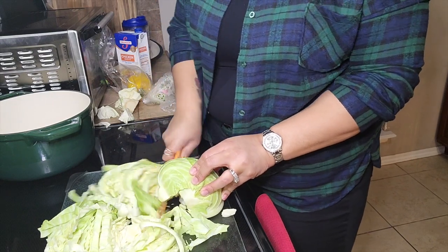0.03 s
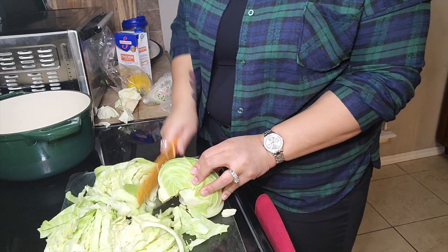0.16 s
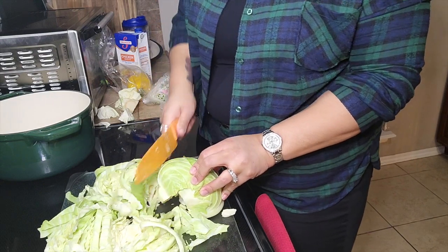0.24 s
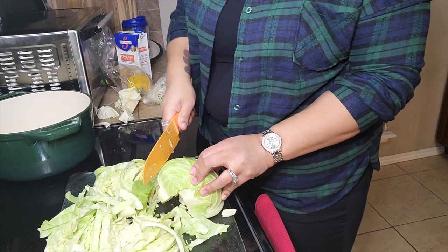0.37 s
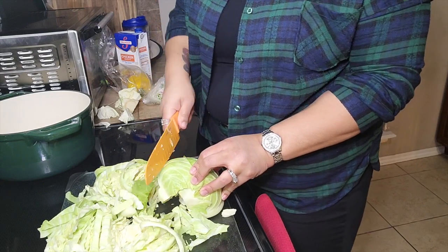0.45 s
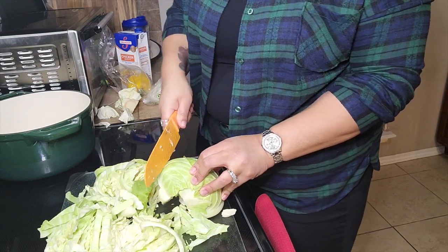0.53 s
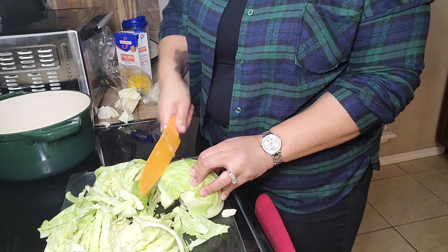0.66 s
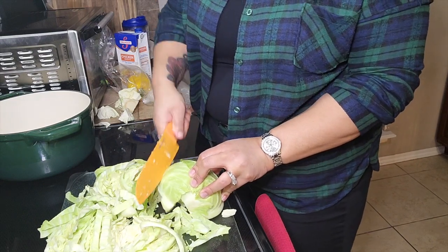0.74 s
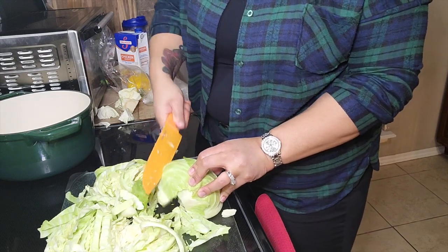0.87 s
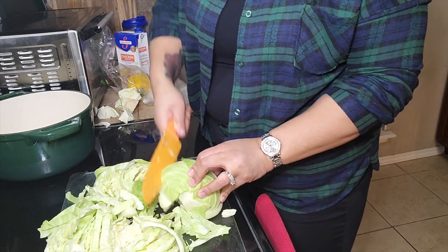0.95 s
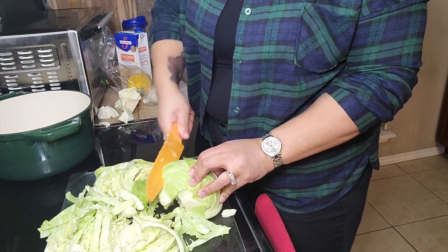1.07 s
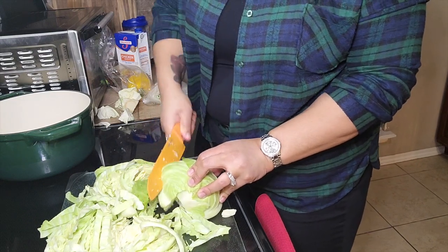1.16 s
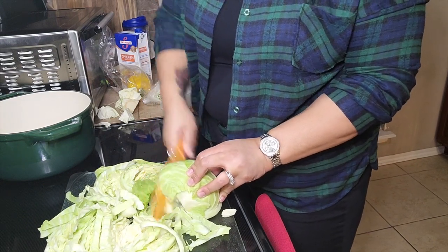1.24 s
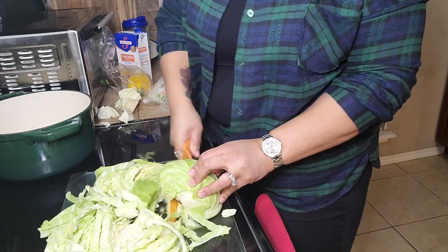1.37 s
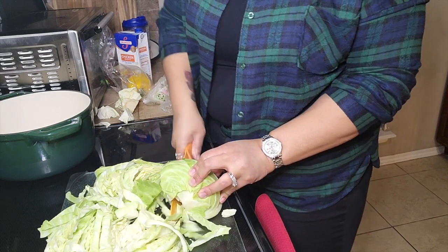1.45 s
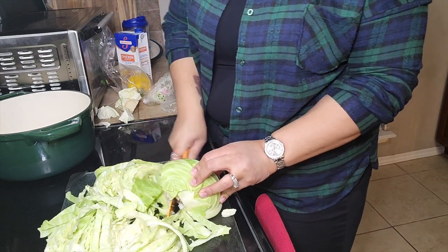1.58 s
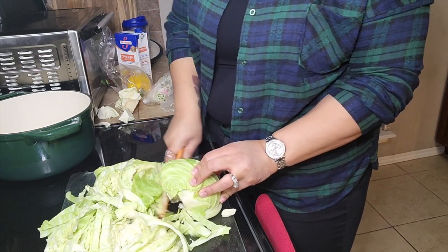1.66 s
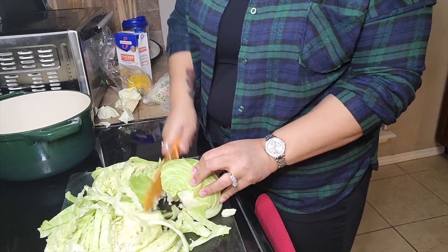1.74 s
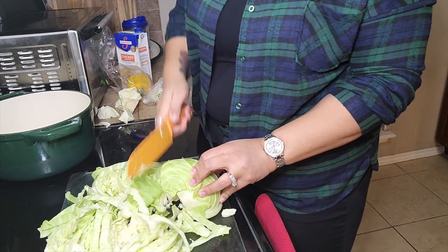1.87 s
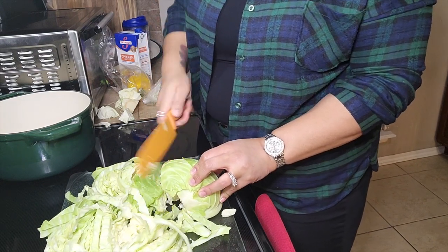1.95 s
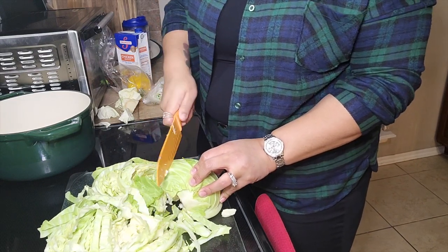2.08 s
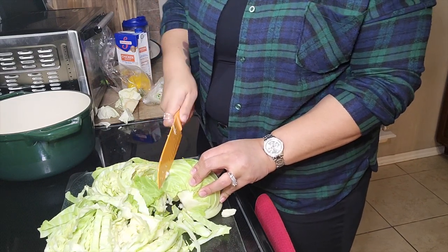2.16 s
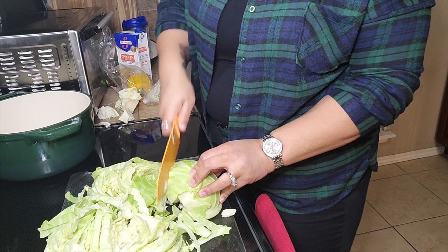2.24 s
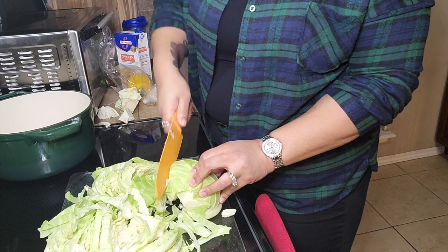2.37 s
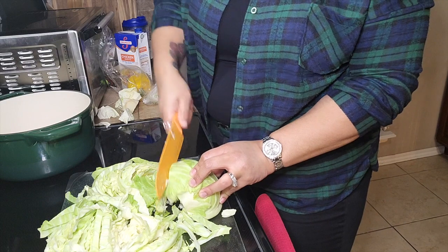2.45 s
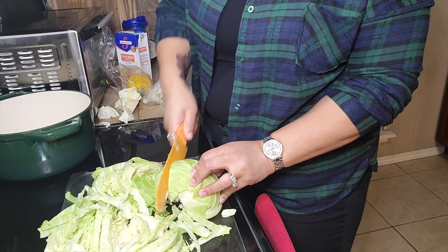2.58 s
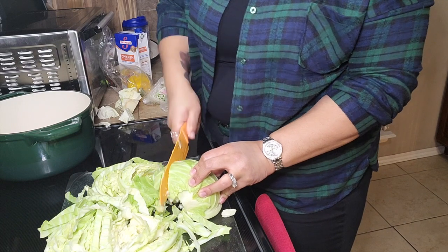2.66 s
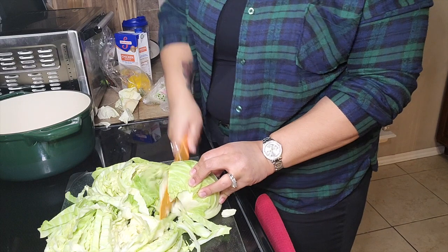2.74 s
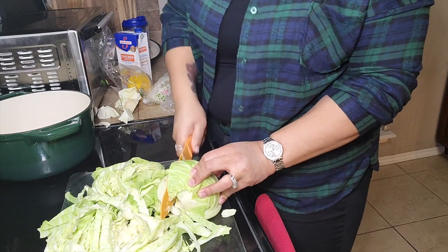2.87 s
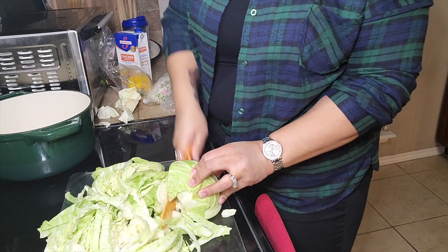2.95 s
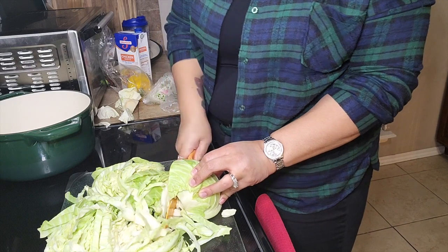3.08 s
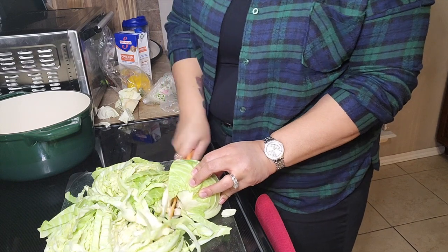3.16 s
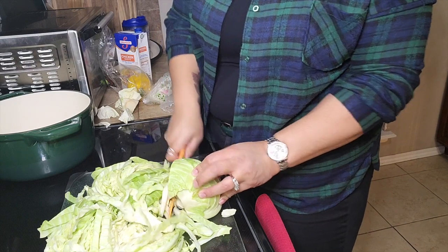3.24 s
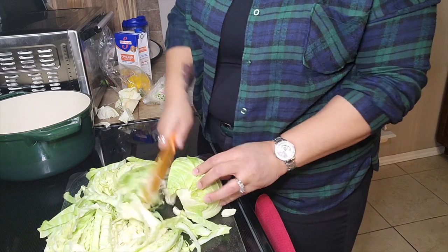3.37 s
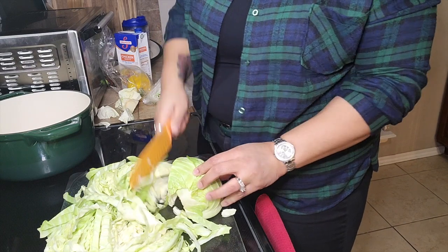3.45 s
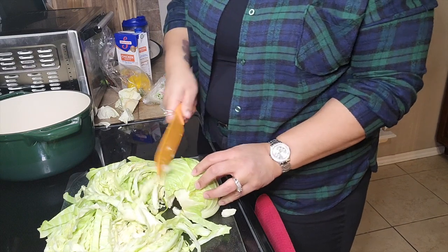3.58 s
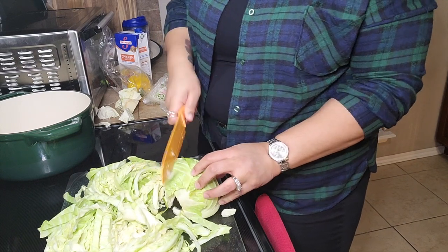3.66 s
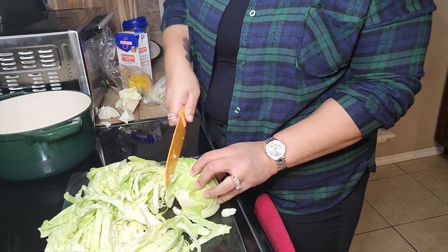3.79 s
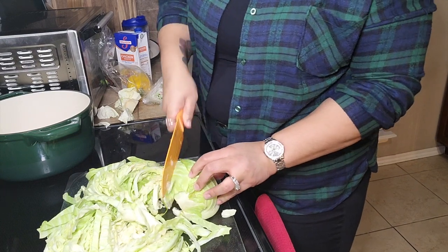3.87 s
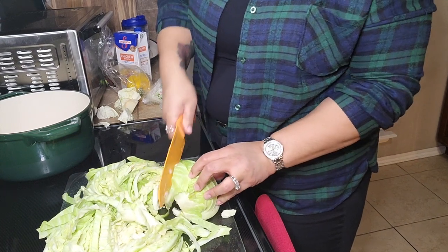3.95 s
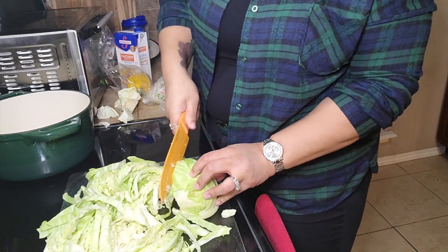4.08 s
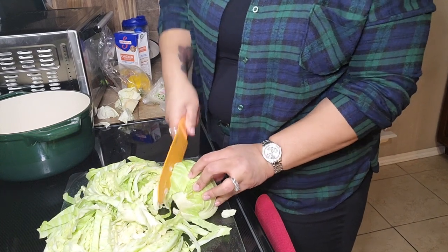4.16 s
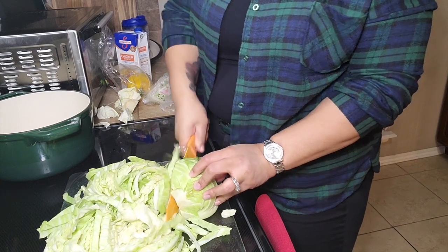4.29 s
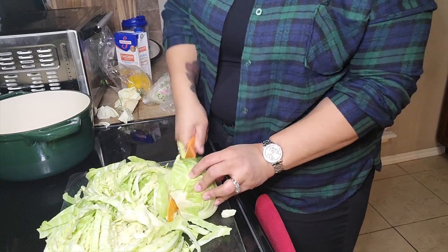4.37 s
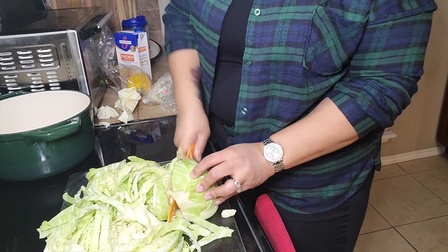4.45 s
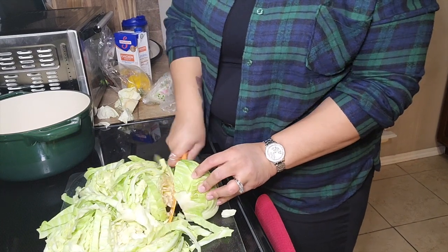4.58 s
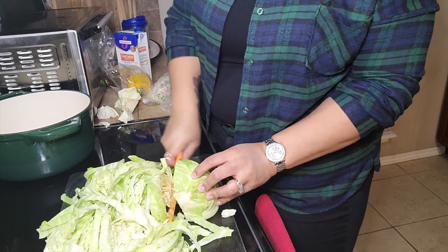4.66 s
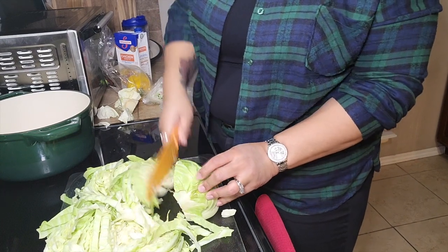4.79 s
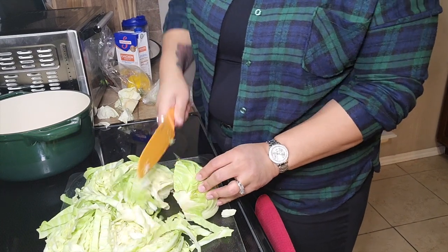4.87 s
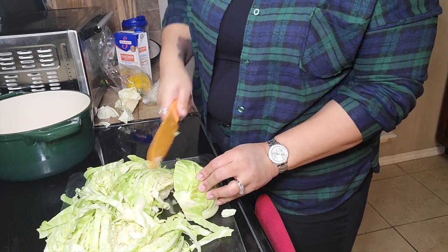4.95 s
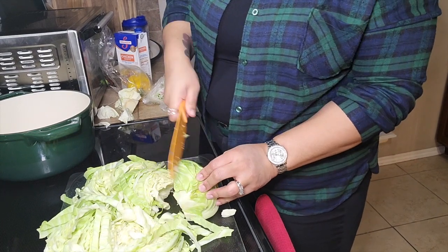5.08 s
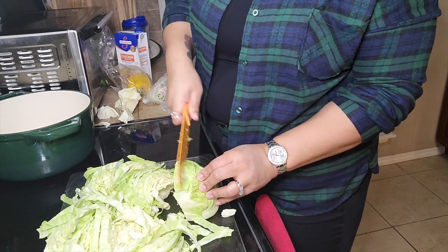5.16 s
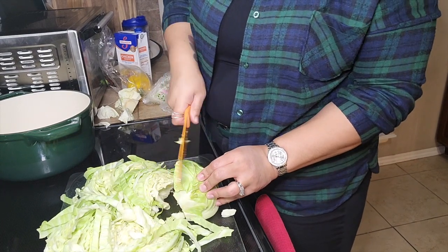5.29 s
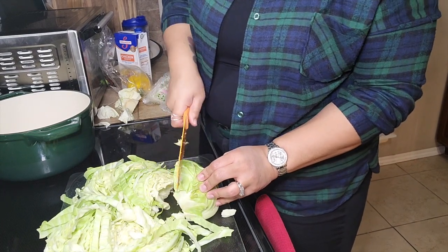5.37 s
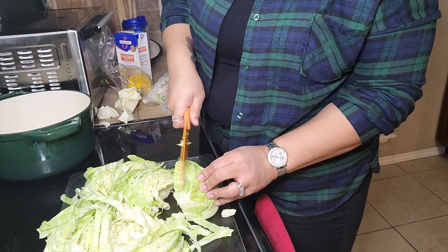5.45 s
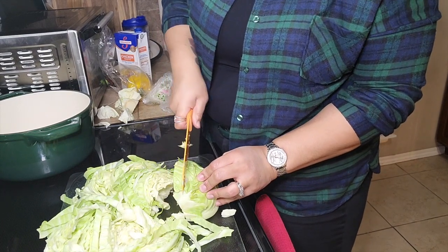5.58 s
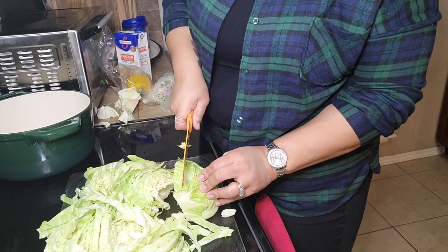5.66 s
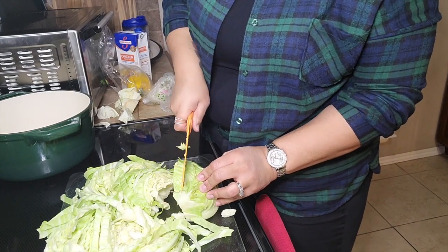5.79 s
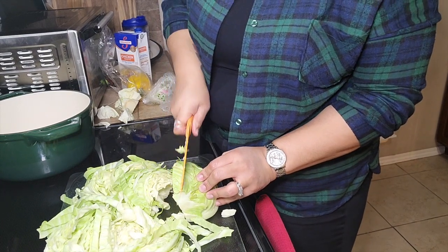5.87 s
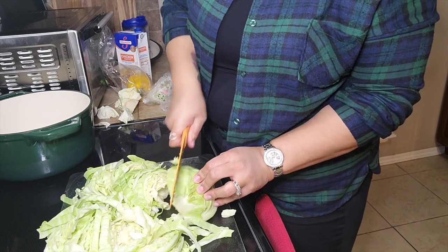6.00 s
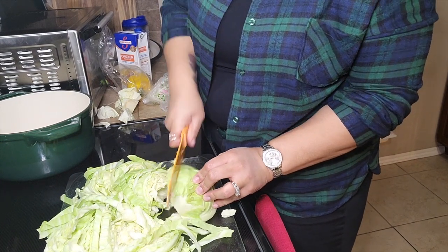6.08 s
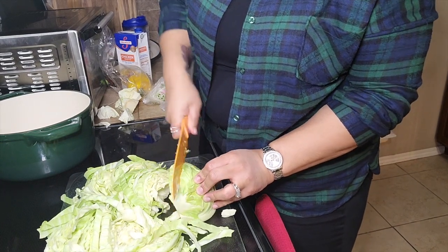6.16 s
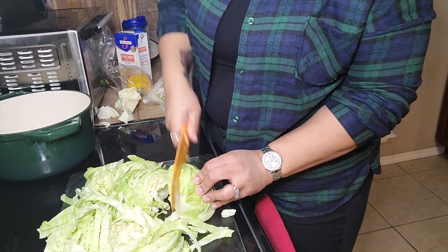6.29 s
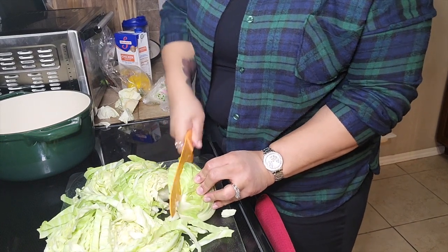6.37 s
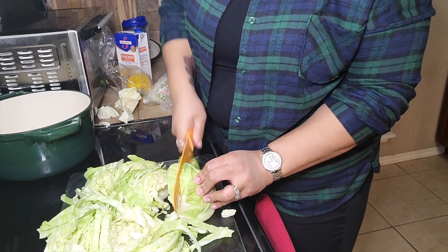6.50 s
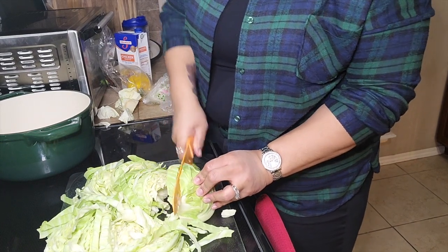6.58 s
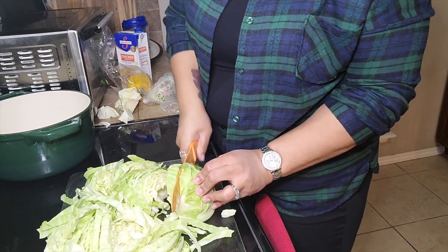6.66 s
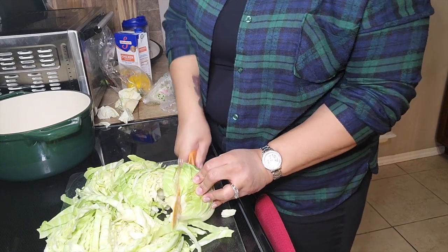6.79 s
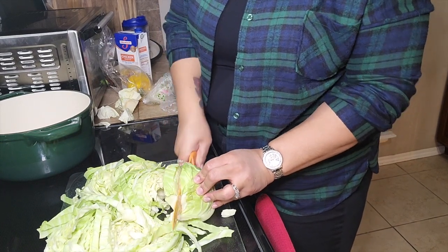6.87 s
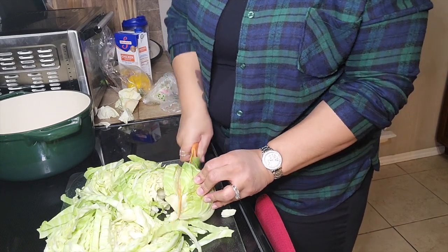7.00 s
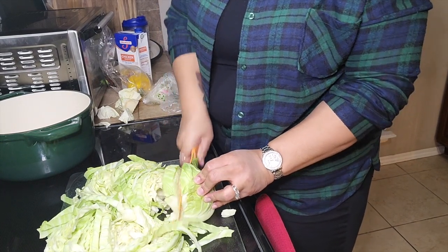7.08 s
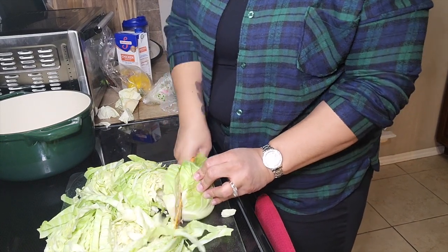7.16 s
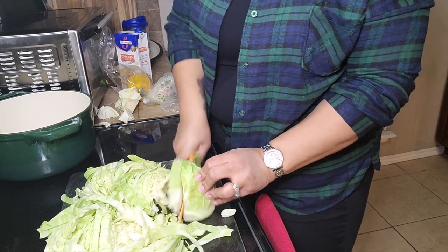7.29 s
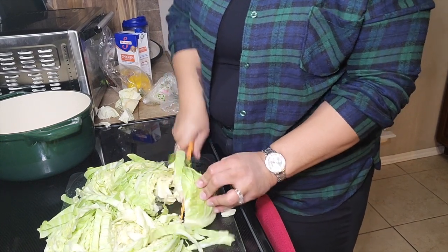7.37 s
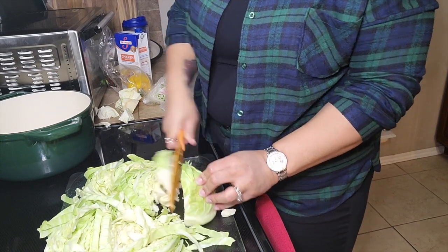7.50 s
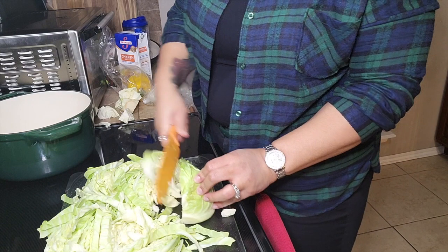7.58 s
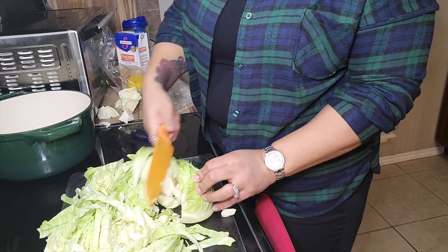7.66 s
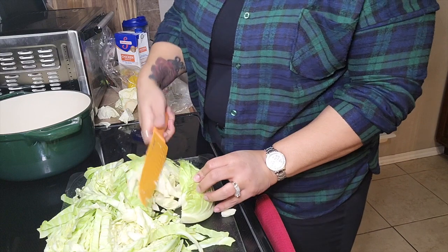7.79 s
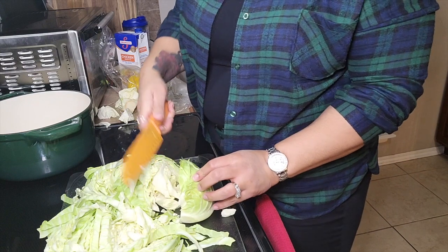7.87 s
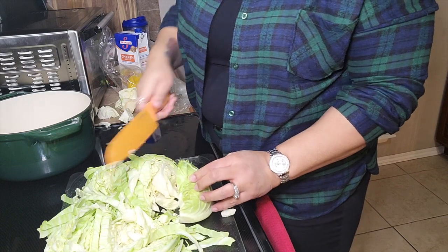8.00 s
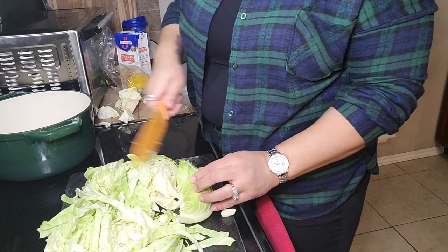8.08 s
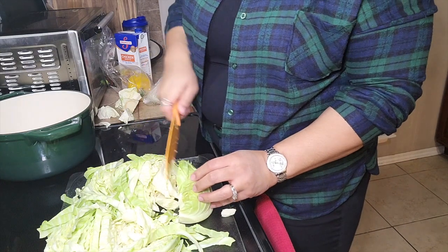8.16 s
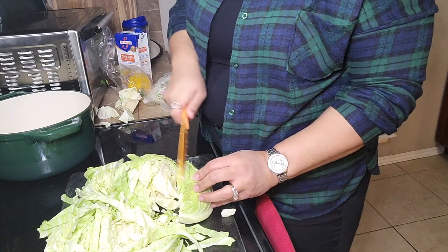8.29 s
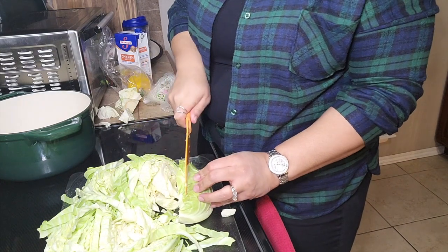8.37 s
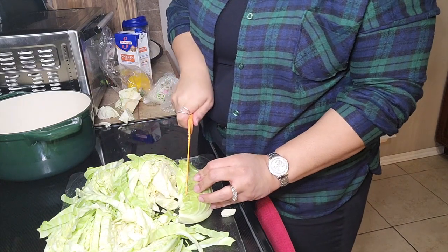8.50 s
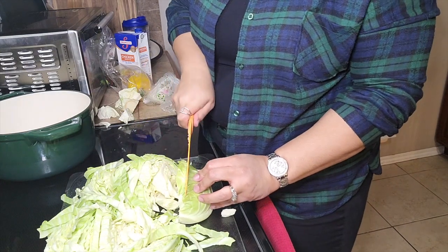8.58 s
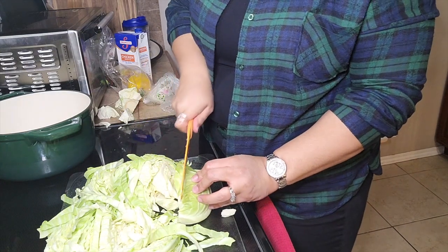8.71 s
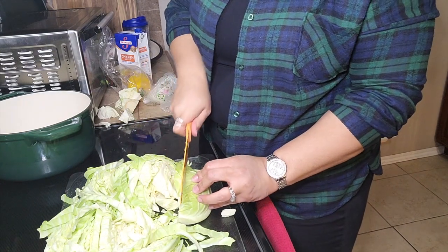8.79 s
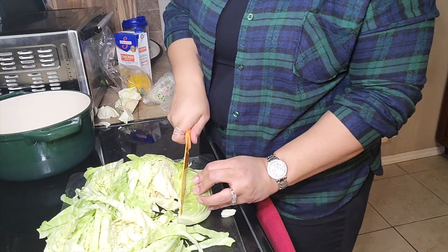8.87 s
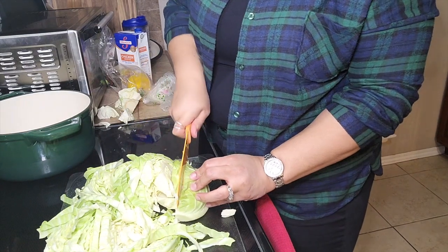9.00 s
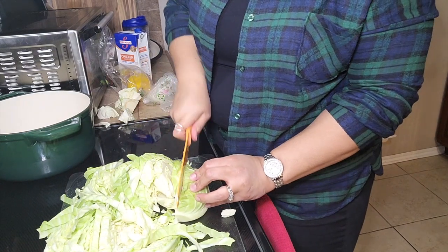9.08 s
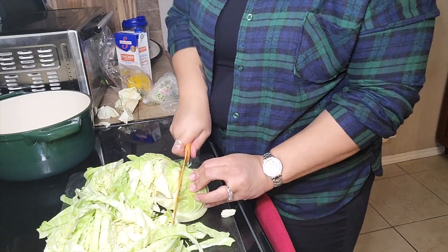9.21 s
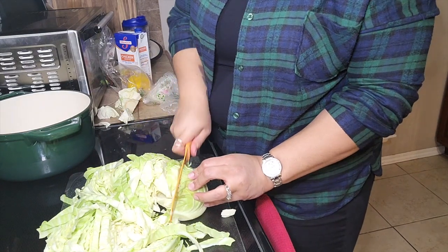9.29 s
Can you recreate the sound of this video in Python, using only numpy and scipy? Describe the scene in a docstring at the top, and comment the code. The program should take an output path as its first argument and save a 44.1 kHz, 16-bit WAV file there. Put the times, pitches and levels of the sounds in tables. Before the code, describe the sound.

Close-up wet, crunchy cabbage chopping on a board, brief scrapes and soft thumps between pauses, in a small humming kitchen.

```python
"""In a small, hard-walled kitchen a knife shreds a head of cabbage on a cutting board, close by.
Each push fractures layers of leaves: random impulses and short ringing grains, coloured by ribs and cells.
Stiff leaves snap as decaying runs of cracks with a hollow tone; low noise thuds as the board rocks.
Now and then the edge grates on the board, a stick-slip impulse train filtered by resonances.
A refrigerator hums behind as slowly wavering sine lines in soft noise; random echoes form the room."""
import sys
import numpy as np
from scipy import signal
from scipy.fft import rfft, irfft, next_fast_len
from scipy.io import wavfile
from scipy.ndimage import uniform_filter1d, map_coordinates

SR = 44100
rng = np.random.default_rng(int(sys.argv[2]) if len(sys.argv) > 2 else 0)


def unload_wav(signal):
    """Save mono or channel-first audio to the path in sys.argv[1] as 16-bit WAV at rate SR, clipped to [-1, 1]."""
    wavfile.write(
        sys.argv[1],
        SR,
        np.round(np.clip(np.atleast_2d(signal).T, -1, 1) * 32767).astype(np.int16),
    )


N = 411894
T = np.arange(N) / SR  # time [s]

# All table levels are relative: the mix and the filters scale them further.
# refrigerator motor and mains lines: (frequency [Hz], level [dB])
HUM_LINES = [(48.5, -53), (59.2, -43.5), (119, -60), (194, -57), (241, -66), (296.5, -62), (386, -64),
             (472, -68), (581, -67), (774.5, -71)]
# slow swell of the hum: (time [s], level [dB])
HUM_SWELL = [(0, -2), (2, -1.5), (3.5, -1), (4.8, 2.5), (5.7, 2), (8, 0), (9.34, 0)]
# spectrum of the rush of air: (frequency [Hz], level [dB])
AIR_COLOUR = [(12, -61), (20, -38.5), (39, -6.5), (63, 5.5), (88, -15.5), (130, -17), (146, -35),
              (187, -25.5), (301, -25), (590, -34), (718, -35.5), (780, -37), (1060, -44), (1370, -44),
              (16000, -83.5)]
# decay of the room's tail by 60 dB: (frequency [Hz], decay time [s])
ROOM_T60 = [(200, 0.54), (800, 0.48), (2000, 0.54), (3800, 0.43), (6000, 0.27), (14000, 0.65)]
# likeness of left and right in diffuse sound: (frequency [Hz], correlation [-1 to 1])
STEREO_LIKENESS = [(60, 0.97), (130, 1), (290, 0.4), (640, .6), (1400, 0.11), (3000, 0), (15000, 0)]
# stereo balance: (frequency [Hz], left minus right [dB])
STEREO_LEAN = [(120, -1.6), (250, -1), (500, -3.5), (1500, -0.2), (4000, 2.3), (8000, 0.4)]
TOP_HZ = 16050  # upper band limit

# the blade is pushed through a layer of leaves:
# (time of full force [s], hold [s], tearing ribs [dB], bursting cells [dB], board shaking [dB])
PUSHES = [(0.691, 0.017, -32, -33.5, -28.5), (0.816, .018, -35, -32.5, -37.5),
          (0.951, 0.045, -26.5, -29.5, -22.5), (1.074, 0.016, -34, -34, -38),
          (1.198, 0.084, -25.5, -28.5, -22.5), (2.253, 0.025, -29, -27.5, -20.5),
          (2.494, 0.049, -26.5, -30, -21), (2.634, 0.0099, -33, -34, -35.5),
          (2.726, 0.057, -27, -30.5, -21.5), (2.944, .037, -28, -33.5, -27),
          (3.9, 0.085, -30.5, -33.5, -21), (4.172, 0.088, -25.5, -29, -21), (4.476, 0.021, -28, -40, -30.5),
          (5.95, 0.062, -33.5, -33, -28), (6.129, .008, -34.5, -33, -31), (6.275, 0.074, -28.5, -30.5, -22),
          (6.536, .072, -30.5, -34.5, -26.5), (6.733, 0.085, -25.5, -30.5, -23.5),
          (7.103, 0.061, -24, -28.5, -24.5), (8.728, 0.034, -39, -34.5, -26.5),
          (8.811, .045, -33, -34, -25.5), (9.121, 0.095, -27.5, -34, -22.5)]
BITE_DB_PER_S, SAG_DB_PER_S, RELEASE_DB_PER_S = 700, 11, 452.5  # a push builds fast, sags, and lets go
RUB_DB, RUB_FADE_DB_PER_S = -15, 85  # after a push the blade rubs on in the cut
# light strokes, the blade sliding in the cut or brushing loose leaves:
# (time [s], hold [s], tearing ribs [dB], bursting cells [dB])
LIGHT_STROKES = [(0.608, .05, -46, -51.5), (1.11, .025, -39, -42.5), (1.371, 0.11, -33, -37.5),
                 (2.2, .03, -47, -46), (2.709, .015, -37, -38.5), (2.854, 0.062, -40.5, -47.5),
                 (2.923, .015, -39, -40), (3.255, 0.15, -57, -56.5), (3.473, 0.036, -53.5, -48.5),
                 (3.683, 0.078, -72.5, -61.5), (3.861, .02, -43.5, -41.5), (4.045, .04, -41.5, -39),
                 (4.158, .015, -34.5, -38.5), (4.337, 0.2, -38.5, -45), (4.576, 0.12, -53, -57.5),
                 (4.746, 0.043, -47.5, -45), (4.86, 0.114, -66, -66), (5.19, 0.013, -60.5, -53.5),
                 (5.39, .05, -68.5, -55), (5.464, 0.019, -50, -32.5), (5.829, .1, -63.5, -53.5),
                 (6.168, 0.049, -42.5, -40), (6.39, .1, -40.5, -43), (6.67, 0.019, -36, -42.5),
                 (6.912, 0.118, -39.5, -46.5), (7.038, .04, -36.5, -42), (7.494, .35, -65, -59),
                 (8.661, 0.055, -47.5, -43.5), (8.981, .08, -47, -51.5), (9.255, 0.079, -43, -53.5)]
STROKE_RISE_DB_PER_S, STROKE_FALL_DB_PER_S = 602, 452
STROKE_SHAKE_DB = 2  # board shaking under a light stroke, over the level of its ribs
# the cabbage is bumped against the board: (time [s], level [dB])
BUMPS = [(3.095, -28.5), (4.43, -29), (5.195, -31), (6.689, -24), (9.235, -28.5)]
BUMP_HOLD_S = .025
# the board rocks just after each push and settles slowly
SHAKE_LAG_S, SHAKE_RISE_DB_PER_S, SHAKE_FALL_DB_PER_S = .018, 551, 278
# spectrum of the rocking: (frequency [Hz], level [dB])
SHAKE_COLOUR = [(25, -19), (42, 6.5), (56, 8), (80, 6.5), (110, -6), (150, -2.5), (190, -12.5), (260, -15),
                (340, -29.5), (600, -69)]

# the edge grating on the board: (time [s], rise [s], hold [s], 60 dB fade [s], level [dB],
# brightness [dB per octave], low body [dB], favoured resonance [Hz])
SCRAPES = [(0, .001, .012, .15, -16, -0.5, -1.5, 600), (1.439, 0.0024, 0.004, .03, -19, 1.5, -2, 1433),
           (1.494, .002, 0.026, .04, -20, 1, -1, 876), (1.517, .006, 0.0098, .04, -15.5, -2.5, -11.5, 890),
           (1.561, .003, .036, .05, -14, 1, 0.5, 871), (1.601, 0.0026, 0.033, .08, -17.5, -0.5, -3, 2162),
           (3.058, .02, .03, .1, -22, 0, -3.5, 1370), (3.083, .001, 0.0022, 0.02, -8, 3.5, 0.5, 2950),
           (3.146, 0.0026, .02, .05, -20.5, 4, 3.5, 1486), (3.168, 0.0057, 0.0052, .08, -14, 1, 3, 2064),
           (7.256, .008, 0.011, .05, -19.5, 0, -2.5, 1880), (7.28, 0.0012, 0.0042, .03, -13, 0, -6.5, 1860),
           (7.285, .004, 0.026, .3, -17.5, 0, -1.5, 1930)]
# spectrum of the grating: (frequency [Hz], level [dB])
GRATE_COLOUR = [(88, -45.5), (150, -15), (303, -11.5), (406, -12), (494, -13), (854, -6.5), (1170, -10.5),
                (1450, -5.5), (2360, -10.5), (5250, -14), (6260, -25.5), (16000, -48.5)]
# ringing of board and blade: (frequency [Hz], width [Hz], usual level [dB])
BOARD_MODES = [(417, 25, 3), (580, 25, 2.5), (892, 100, -7.5), (960, 25, -10), (1330, 88, -0.5),
               (1810, 46, -3.5), (2160, 9.1, -6.5), (2444, 23, -2), (3200, 50, -5), (3470, 25, -7.5),
               (3680, 240, -6), (4020, 55, -6), (4900, 150, -17.5), (5140, 87, -11.5), (5750, 30, -22),
               (6510, 140, -26.5)]
# the board's broad, damped response, strongest from 700 Hz to 2 kHz: (frequency [Hz], level [dB])
BOARD_DAMPED = [(220, -6.5), (400, -14.5), (700, -4), (2000, -5), (4000, -13), (9000, -6.5)]

# single leaves snapping: (time [s], crack [dB], hollow pock over the crack [dB])
SNAPS = [(.3253, -51.5, -8), (.4788, -53.5, -11), (0.5953, -35, 0), (0.6223, -31, 3), (.9266, -30, -5),
         (.9405, -22.5, 8), (1.068, -26, -9), (1.1092, -23, -13.5), (1.19, -28, -3), (1.8246, -41.5, -6),
         (2.0382, -48, -12), (2.1284, -49, -9), (2.1647, -40.5, -6), (2.2157, -25.5, -19),
         (2.2523, -15.5, -18), (2.4687, -31, -4.5), (2.4902, -22.5, -2), (2.7643, -26, 8.5),
         (3.071, -24.5, -8.5), (3.0865, -17, -8.5), (3.4583, -43, -10), (3.9034, -17, -18),
         (3.9508, -15, -27), (3.9872, -27, 7), (4.1345, -23, -12), (4.2094, -24.5, 8.5), (4.3374, -27, -2),
         (4.4787, -28, -8), (4.706, -39.5, 2), (5.1803, -37, -14), (5.2908, -37, -11), (5.4572, -29.5, -27),
         (5.6462, -42.5, -11), (5.8653, -34.5, -7), (5.9539, -18, -20), (5.9756, -16.5, -28),
         (6.095, -26, -29), (6.127, -22, -7.5), (6.5815, -14.5, -12), (6.7238, -15, -7),
         (6.901, -36.5, 11.5), (6.9494, -41, 18), (7.0369, -25, 0), (7.2815, -18, -11), (7.977, -48, -9),
         (8.1205, -47.5, -2), (8.6408, -30.5, -4), (8.6837, -22.5, -7), (8.7076, -30.5, -11),
         (8.806, -25.5, 4), (9.105, -21, -11), (9.1241, -14.5, -10)]
# spectrum of a snap: (frequency [Hz], level [dB])
SNAP_COLOUR = [(600, -22.5), (1500, -5.5), (2800, -9.5), (3900, -5), (5200, 1.5), (6400, -9.5), (9000, -2),
               (15000, -8)]
POCK_HZ, POCK_SCATTER = 917, .2  # a rib's median note, and its relative spread from leaf to leaf
SNAP_TOP_DB, SNAP_DULLING = -10, 0.32  # usual treble change, and loss per dB of strength: thick is dull
# candidate chance snaps, their level over the bursting cells, and their pock over the crack
SMALL_SNAPS_PER_S, SMALL_SNAP_DB, SMALL_SNAP_POCK_DB = 9.3, 5, -6

# spectrum of the tearing ribs: (frequency [Hz], level [dB])
RIB_COLOUR = [(150, -26), (260, -4.5), (340, -13), (430, -1), (580, -8), (850, 5), (1050, -5), (1400, 1),
              (2000, -7), (2800, -17), (4200, -36.5), (6600, -57.5)]
# spectrum of the bursting cells: (frequency [Hz], level [dB])
CELL_COLOUR = [(1530, -46.5), (2600, -2.5), (3830, -3.5), (4670, -2), (5270, -1.5), (6330, -11),
               (8980, -7.5), (12900, -14.5), (16000, -24)]


def amp(db):
    """Logarithmic level: 20 dB is a factor of ten in amplitude."""
    return 10 ** (np.asarray(db) / 20)


def unit(x):
    """Power normalisation: scale to rms 1."""
    return x / np.sqrt(np.mean(np.abs(x) ** 2) + 1e-20)


def along(points, hz):
    """Interpolation of (frequency, value) points on a logarithmic frequency axis."""
    f, v = np.transpose(points)
    return np.interp(np.log(hz + 1), np.log(f + 1), v)


def colour(points):
    """Spectral envelope: (frequency, dB) points as a gain over frequency."""
    return lambda hz: amp(along(points, hz))


def wobble(rate):
    """Smooth random fluctuation: a spline through rate random knots per second."""
    knots = rng.standard_normal(int(N * rate / SR) + 4)
    return map_coordinates(knots, [T * rate])


def filtered(x, response):
    """Linear filtering: multiply the spectrum by a response of frequency."""
    n = x.shape[-1]
    m = next_fast_len(n + 8192)
    return irfft(rfft(x, m) * response(np.fft.rfftfreq(m, 1 / SR)), m)[..., :n]


def ring(gain, size=4096):
    """Minimum phase: the folded cepstrum of a gain gives a causal impulse response of energy 1."""
    cepstrum = irfft(np.log(np.maximum(gain(np.fft.rfftfreq(size, 1 / SR)), 1e-6)))
    cepstrum[1:size // 2] *= 2
    cepstrum[size // 2 + 1:] = 0
    h = irfft(np.exp(rfft(cepstrum)))
    return h / np.linalg.norm(h)


def add(track, s, sound):
    """Superposition: mix a sound into the track at time s."""
    i = max(round(s * SR), 0)
    track[i:i + len(sound)] += sound[:max(N - i, 0)]


def leveled(x, size):
    """Constant local power: divide by the running rms over size samples."""
    return x / np.sqrt(np.abs(uniform_filter1d(x ** 2, size=size)) + 1e-4)


def fractures(n, rate, spread_db):
    """Random fracture: impulses at chance moments, of very unequal size, rms 1."""
    happens = rng.random(n) < rate / SR
    sign = rng.choice([-1, 1], n)
    size = amp(spread_db * np.clip(rng.standard_normal(n), -2, 2))
    return unit(happens * sign * size)


def diffuse(n):
    """Diffuse field: stereo noise alike in the bass and unrelated in the treble."""
    def mid_side(hz):
        """The angle between mid and side sets the correlation of the channels."""
        turn = np.arccos(np.clip(along(STEREO_LIKENESS, hz), -1, 1)) / 2
        return np.array([np.cos(turn), np.sin(turn)])

    mid, side = filtered(rng.standard_normal((2, n)), mid_side)
    return np.array([mid + side, mid - side])


def refrigerator(air_db, hiss_db):
    """Line spectrum: wavering motor and mains tones over a rush of air and microphone hiss."""
    def line(hz):
        """Phase modulation: a sine whose phase wanders, more so at high frequency."""
        phase = hz / 450 * wobble(3) + 2 * np.pi * rng.random()
        return np.sqrt(2) * np.sin(2 * np.pi * hz * T + phase)

    hum = sum(amp(db + .7 * wobble(3)) * line(hz) for hz, db in HUM_LINES)
    hum_gain = amp(np.interp(T, *np.transpose(HUM_SWELL)))
    bass_cut = [(70, -14.0), (250, 2.5)]
    air = unit(filtered(diffuse(N), lambda hz: amp(along(AIR_COLOUR, hz) + along(bass_cut, hz))))
    hiss = rng.standard_normal((2, N))
    return hum_gain * hum + amp(air_db) * air + amp(hiss_db) * hiss


def moving(x, responses, size):
    """Echoes of a moving source: each short, overlapping stretch meets a new stereo response."""
    hop = size // 2
    padded, out = np.pad(x, (hop, size)), np.zeros((2, N + SR))
    window = np.sqrt(np.hanning(size))
    for i in range(0, N + hop, hop):
        response = responses()
        response = response / np.linalg.norm(response) * np.sqrt(2)
        stretch = padded[i:i + size] * window
        echo = signal.fftconvolve(stretch[None], response, axes=1)
        out[:, i:i + echo.shape[1]] += echo
    return out[:, hop:hop + N]


def kitchen(x, direct_db, near_db, near_t60, room_db, size):
    """Reverberation: direct sound, scatter from pot and counter (new every half size), and a tail."""
    noise = diffuse(3 * SR)
    hz, t, z = signal.stft(noise, SR, nperseg=256)
    decay = amp(-60 * t / along(ROOM_T60, hz)[:, None])
    fade = (decay * (1 - np.exp(-t / .008)))[:, :170]  # the tail builds up over some 8 ms
    lag = T[:SR // 30]
    quick = amp(-60 * lag / near_t60) * (lag > .0003)

    def near():
        """Early reflections: a short decaying excerpt of diffuse noise."""
        return noise[:, rng.integers(2 * SR):][:, :len(lag)] * quick

    def tail():
        """Late reverberation: diffuse noise with a decay time for each frequency."""
        start = rng.integers(z.shape[-1] - fade.shape[1])
        return signal.istft(z[..., start:start + fade.shape[1]] * fade, SR, nperseg=256)[1]

    early = amp(near_db) * moving(x, near, size=size)
    late = amp(room_db) * moving(x, tail, size=16384)
    return amp(direct_db) * x + early + late


def swell(start, hold, rise, fall):
    """Exponential growth and decay: 0 dB during the hold, straight dB-per-second slopes around it."""
    return -rise * np.maximum(start - T, 0) - fall * np.maximum(T - start - hold, 0)


def effort():
    """Dominant force: the strongest action of the blade sets the gain of ribs, cells and shaking."""
    ribs, cells, shake = np.full((3, N), -120.0)
    for s, hold, ribs_db, cells_db, shake_db in PUSHES:
        force = swell(s, hold, BITE_DB_PER_S, RELEASE_DB_PER_S) - SAG_DB_PER_S * np.clip(T - s, 0, hold)
        rub = RUB_DB + swell(s, hold, BITE_DB_PER_S, RUB_FADE_DB_PER_S)
        force = np.maximum(force, rub)
        rocking = swell(s + SHAKE_LAG_S, hold, SHAKE_RISE_DB_PER_S, SHAKE_FALL_DB_PER_S)
        ribs = np.maximum(ribs, ribs_db + force)
        cells = np.maximum(cells, cells_db + force)
        shake = np.maximum(shake, shake_db + rocking)
    for s, hold, ribs_db, cells_db in LIGHT_STROKES:
        force = swell(s, hold, STROKE_RISE_DB_PER_S, STROKE_FALL_DB_PER_S)
        ribs = np.maximum(ribs, ribs_db + force)
        cells = np.maximum(cells, cells_db + force)
        shake = np.maximum(shake, ribs_db + STROKE_SHAKE_DB + force)
    for s, db in BUMPS:
        rocking = swell(s, BUMP_HOLD_S, SHAKE_RISE_DB_PER_S, SHAKE_FALL_DB_PER_S)
        shake = np.maximum(shake, db + rocking)
    return amp([ribs, cells, shake])


def shaking(push, level_db):
    """Forced vibration: the jerking blade rocks board and counter in a low thudding."""
    sway = signal.hilbert(filtered(rng.standard_normal(N), colour(SHAKE_COLOUR)))
    even_sway = unit(sway.real / uniform_filter1d(np.abs(sway), size=1100))
    thuds = amp(level_db) * push * even_sway
    return filtered(thuds, colour([(22, -24.0), (32, -13), (46, 0.5)]))


def board(hz, damped_db):
    """Modal resonance: peaks of new strength at each contact, over a damped response."""
    modes = 0
    for f, width, db in BOARD_MODES:
        strength = amp(db + 1.7 * rng.standard_normal()) ** 2
        modes = modes + strength / (1 + (2 * (hz - f) / width) ** 2)
    return np.sqrt(amp(damped_db + along(BOARD_DAMPED, hz)) ** 2 + modes)


def scrapes(level_db, slip_rate, grit):
    """Stick-slip friction: the edge jerks along, and each place of contact rings the board differently."""
    out, t = np.zeros(N), np.arange(SR // 4) / SR
    for s, rise, hold, fade, db, bright_db, body_db, favoured_hz in SCRAPES:
        force = np.minimum(t / max(rise, 1e-4), 1) * amp(-60 * np.maximum(t - rise - hold, 0) / fade)
        slips = fractures(len(t), rate=slip_rate, spread_db=3.5) + grit * rng.standard_normal(len(t))
        slips = force * leveled(slips, size=260)

        def contact(hz):
            """Superposed colour: spectral tilt, low body and one favoured resonance on the board."""
            tilt_db = bright_db * np.log2(np.clip(hz, 400, 6000) / 1500)
            low_db = body_db / (1 + (hz / 750) ** 4)
            favour_db = 4 / (1 + (np.log(hz / favoured_hz + 1e-6) / 0.097) ** 2)
            total_db = along(GRATE_COLOUR, hz) + tilt_db + low_db + favour_db
            return amp(total_db) * board(hz, damped_db=-2.5)

        sound = signal.fftconvolve(slips, ring(contact))
        # the energy follows the force, whatever the resonances
        add(out, s, amp(db + level_db) * sound * np.linalg.norm(force) / np.linalg.norm(sound))
    return out


def small_snaps(cells):
    """Chance fracture: rows like SNAPS at random moments, as strong as the cutting is just then."""
    rows = []
    for i in rng.integers(N, size=int(SMALL_SNAPS_PER_S * N / SR)):
        if cells[i] > amp(-60):
            rows.append((i / SR, 20 * np.log10(cells[i]) + SMALL_SNAP_DB, SMALL_SNAP_POCK_DB))
    return rows


def snaps(rows, level_db, t60, pock_db, pock_t60):
    """Brittle fracture: a crack, a quick run of smaller ones, and a hollow pock from the rib."""
    out, t = np.zeros(N), np.arange(SR // 20) / SR
    usual_db = np.mean([row[1] for row in SNAPS])
    for s, db, body_db in rows:
        run = fractures(len(t), rate=3800, spread_db=5.5) * amp(-60 * t / t60)
        run = run / (np.linalg.norm(run) + 1e-9) + 0.32 * (t == 0)  # the first crack starts the run
        top_db = SNAP_TOP_DB - SNAP_DULLING * (db - usual_db)

        def leaf(hz):
            """High shelf: treble above some 6900 Hz depends on the strength of the snap."""
            return amp(along(SNAP_COLOUR, hz) + top_db * hz ** 6 / (hz ** 6 + 6900.0 ** 6))

        add(out, s, amp(db + level_db) * signal.fftconvolve(run, ring(leaf)))
        rib_hz = POCK_HZ * np.exp(POCK_SCATTER * rng.standard_normal())
        pock = np.sin(2 * np.pi * rib_hz * t) * amp(-60 * t / pock_t60)
        add(out, s, amp(db + body_db + pock_db) * pock)
    return out


def fibres(rate, cycles, spread_db):
    """Damped free vibration: each parting fibre rings a few cycles at its own pitch; rms 1."""
    t = np.arange(SR // 100) / SR
    when, pitch, life, size = rng.random((int(rate * N / SR), 4)).T[:, :, None]
    hz = 550 * 13 ** pitch
    life = cycles * (.5 + life) / hz  # decay time constant [s]
    strength = amp(spread_db * np.minimum(-np.log(1 - size), 3)) * np.sqrt(hz / life)
    grains = strength * np.exp(-t / life) * np.sin(2 * np.pi * hz * t)
    grains = grains * (1 - t / t[-1])  # ends in silence
    at = (when * N).astype(int) + np.arange(len(t))
    return unit(np.bincount(at.ravel(), grains.ravel(), N)[:N])


def crunch(ribs, cells, ribs_db, cells_db, clump_db, thin_db):
    """Clustered fracture: ribs tear and cells burst in clumps as the edge passes each leaf."""
    clumps = amp(clump_db * wobble(170))
    cracks = fractures(N, rate=650, spread_db=4.0)
    fizz = fractures(N, rate=6000, spread_db=4.5)
    pops = fibres(rate=700, cycles=2.7, spread_db=3.0)
    rib_breaks = clumps * (cracks + 0.46 * pops + 0.74 * fizz)
    cell_breaks = clumps * (cracks + .5 * pops + fizz)
    # the blade's advance sets how much breaks in any short stretch
    tear = leveled(signal.fftconvolve(rib_breaks, ring(colour(RIB_COLOUR)))[:N], size=1400)
    burst = leveled(signal.fftconvolve(cell_breaks, ring(colour(CELL_COLOUR)))[:N], size=1400)
    # where no rib tears, only thin leaves rustle, and they sound brighter
    thin = (cells / (cells + ribs)) ** 2
    thin_colour = colour([(2500, -32.5), (5000, 9), (7000, -2.5), (12000, 1.5), (16000, -7.5)])
    rustle = leveled(filtered(fractures(N, rate=4200, spread_db=8), thin_colour), size=1400)
    leaf_cells = amp(cells_db) * (1 - thin) * burst + amp(thin_db) * thin * rustle
    return amp(ribs_db) * ribs * tear + cells * leaf_cells


def scene():
    """Superposition of cabbage and board in the humming kitchen, with a slight stereo lean."""
    ribs, cells, shake = effort()
    leaves = crunch(ribs, cells, ribs_db=-1, cells_db=0, clump_db=1.0, thin_db=-3.5)
    all_snaps = [*SNAPS, *small_snaps(cells)]
    leaves = leaves + snaps(all_snaps, level_db=15.0, t60=0.026, pock_db=1, pock_t60=0.034)
    edge = scrapes(level_db=1.5, slip_rate=900, grit=0.25)
    cabbage = kitchen(leaves, direct_db=-5, near_db=-0.5, near_t60=0.023, room_db=-9.0, size=3072)
    grating = kitchen(edge, direct_db=-5.5, near_db=-1, near_t60=.028, room_db=-10.5, size=8192)
    background = refrigerator(air_db=-46.5, hiss_db=-71.5)
    mix = cabbage + grating + shaking(shake, level_db=-3.5) + background
    halves = np.array([[.5], [-.5]])  # left up and right down by half the lean
    return filtered(mix, lambda hz: amp(halves * along(STEREO_LEAN, hz)))


def record(dry):
    """Saturation and band limit: the highest peaks are rounded off, the top of the spectrum removed."""
    rounded = dry / (1 + np.abs(dry) ** 6) ** (1 / 6)
    return filtered(rounded, lambda hz: hz < TOP_HZ)


dry = scene()
out = record(dry)
unload_wav(out)
```